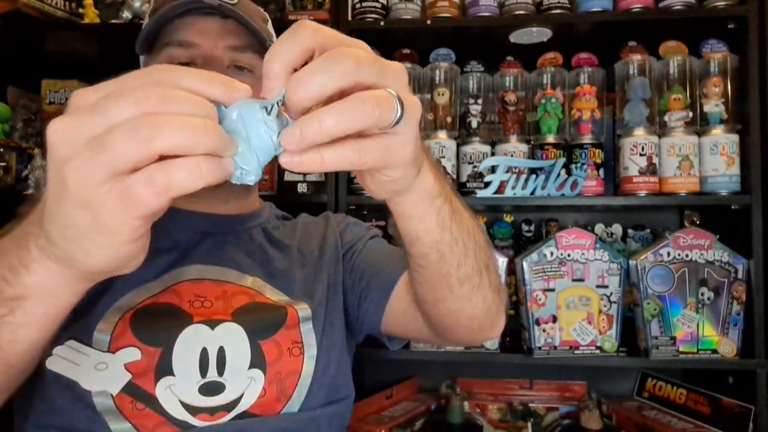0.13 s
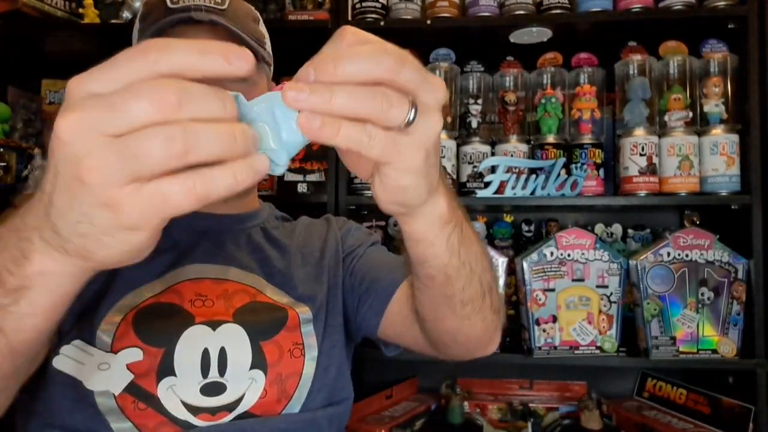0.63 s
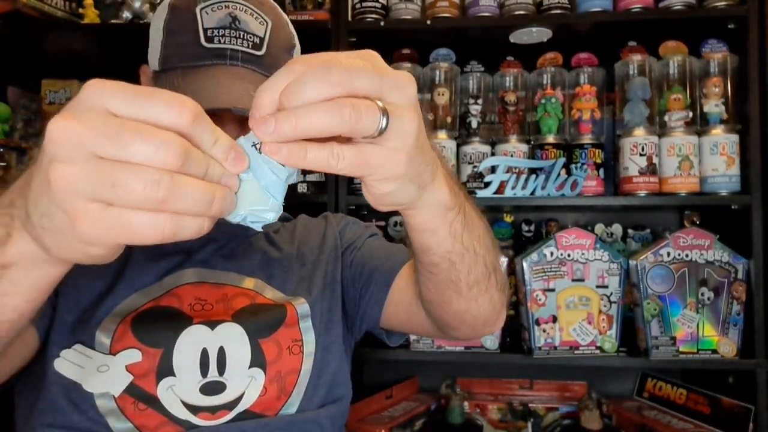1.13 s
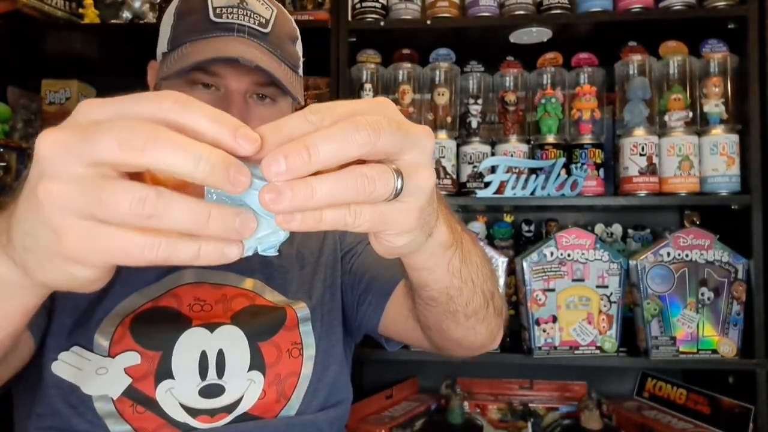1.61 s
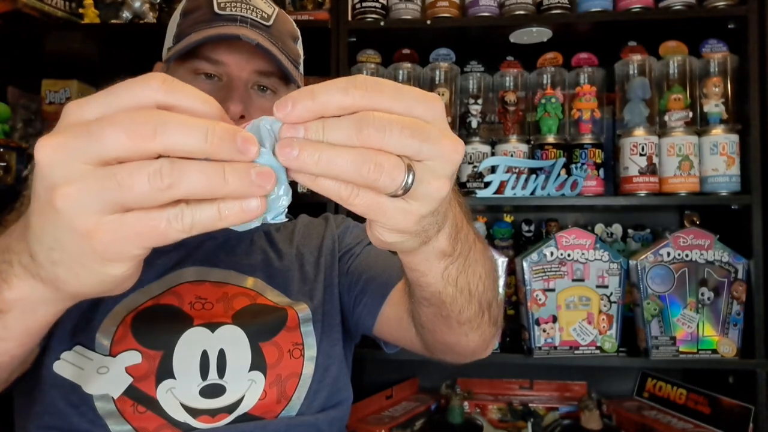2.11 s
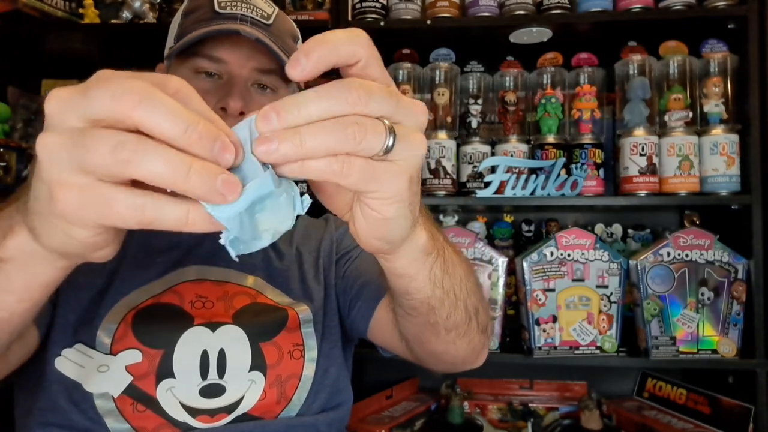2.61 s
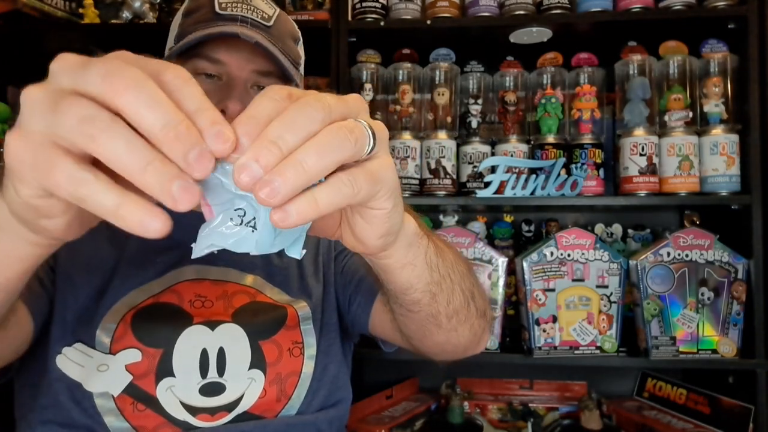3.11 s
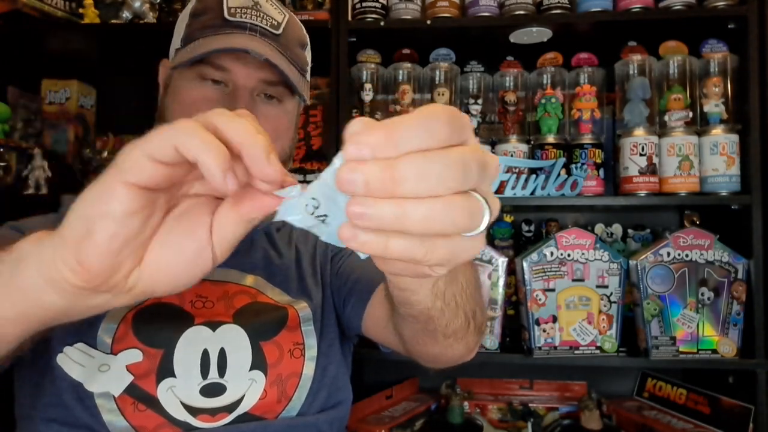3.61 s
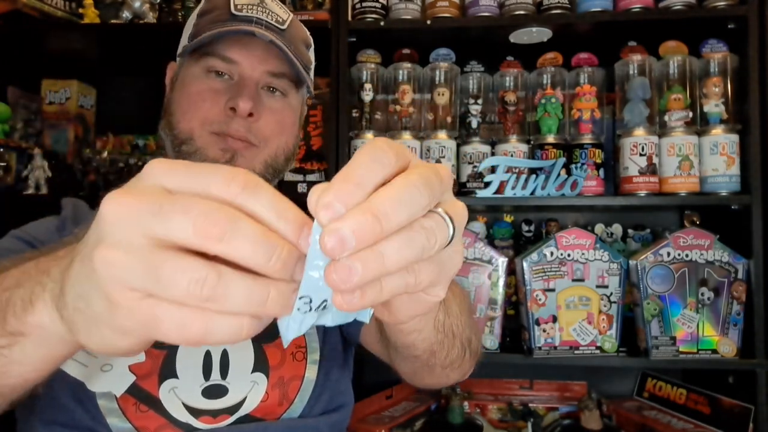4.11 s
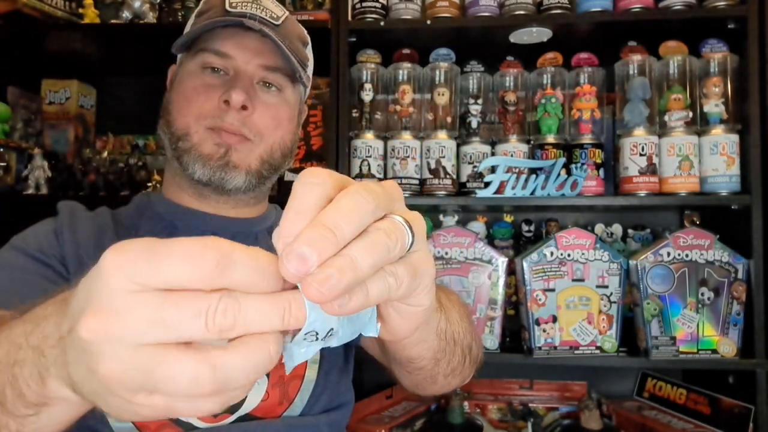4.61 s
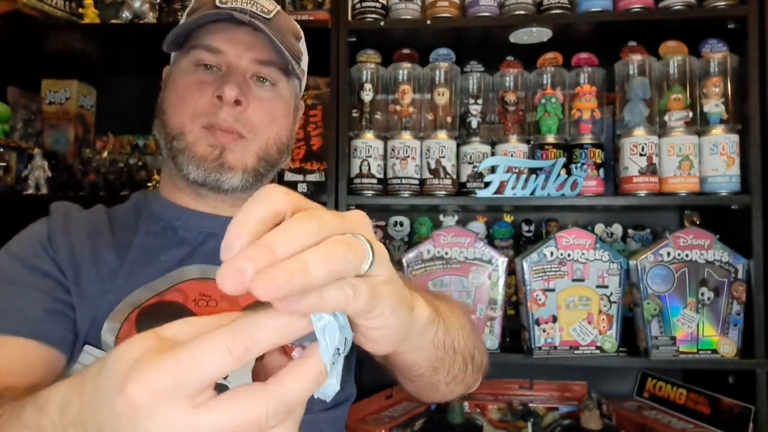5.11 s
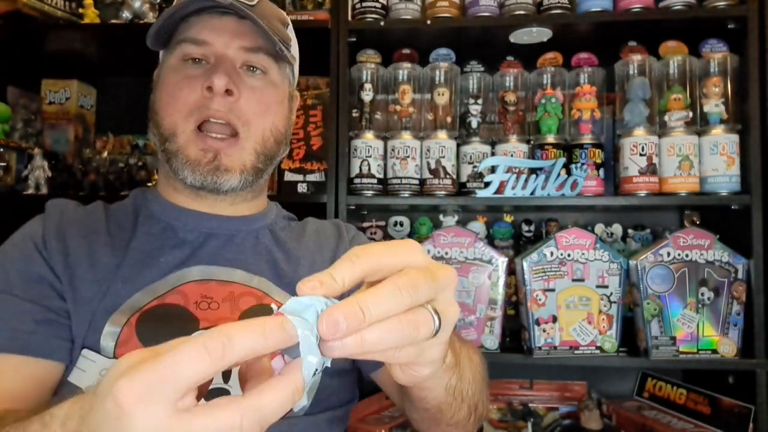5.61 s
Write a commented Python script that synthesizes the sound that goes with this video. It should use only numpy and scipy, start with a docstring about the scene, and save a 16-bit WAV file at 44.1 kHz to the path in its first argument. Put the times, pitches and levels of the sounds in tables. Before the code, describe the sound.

A small, thin plastic wrapper is worked and pulled open by two hands, close to a stereo pair of microphones in a furnished room. From 0 to 0.4 s, a dense burst of bright, dry snaps and fine crackle. It thins to scattered crinkles until about 1.1 s, then gets busy again to 2.8 s, with clumps of sharp ticks and papery rustle and a few soft low puffs near 2.3 to 2.7 s. After a tiny lull, crinkling resumes around 3 s; strong squeezes at 3.5 to 3.75 s add fuller snaps and a dull thump. From 3.8 to 4.7 s only separate light ticks and short crackles. From 4.8 to 5.7 s a dense finish, with more body and soft thumps near 5.0 and 5.45 s. Short diffuse room reflections follow each snap. A very faint low hum swells and sinks beneath, with slight hiss.

```python
"""Two hands crumple and pull open a small thin plastic wrapper close to two microphones in a furnished room.
A dense burst of snaps and crackle opens the scene and thins out after 0.4 s; from 1.1 s to 2.8 s it is busy again.
Strong squeezes and soft thumps follow near 3.5 s, then a sparser stretch, then a dense finish from 4.8 to 5.7 s.
Snaps and crackle are kicked ringing patches of film; thumps are short low swings. Throughout, a noise-and-tone
hum swells and sinks, and a tail of shaped noise answers the wrapper as the room."""
import sys
import numpy as np
from scipy import signal
from scipy.fft import rfft, irfft, next_fast_len
from scipy.io import wavfile

SR = 44100
rng = np.random.default_rng(int(sys.argv[2]) if len(sys.argv) > 2 else 0)


def ratio(d):
    """dB to gain"""
    e = np.asarray(d, float) / 20
    return 10 ** e


def dump(signal):
    """Clip the signal to [-1, 1] and save it as 16-bit WAV at the path in sys.argv[1]."""
    limited = np.clip(np.atleast_2d(signal).T, -1, 1)
    pcm = np.round(limited * 32767).astype(np.int16)
    wavfile.write(sys.argv[1], SR, pcm)


N = 252773   # length in samples


def at_hz(points, hz):
    """Reads a spectrum on a log-frequency axis."""
    point_hz, point_db = np.transpose(points)
    return np.interp(np.log(hz), np.log(point_hz), point_db)


def drift(rate_hz):
    """Slow chance with spread 1: white noise smoothed by two equal low-pass steps."""
    r = np.exp(-2 * np.pi * rate_hz / SR)
    slow = signal.lfilter([1], [1, -2 * r, r * r], rng.standard_normal(N + SR))[SR:]   # skip the start-up
    return slow / slow.std()


# colour of the low house noise; only its shape counts: pitch_hz [Hz], level_db [dB]
HUM_COLOUR = [(18, -40), (30, -20), (64, -10), (97, -1), (188, 9), (209, 10), (241, -12), (281, -6),
              (500, -53), (650, -41), (1100, -120)]
# the hum swells and sinks: time_s [s], level_db [dB]
HUM_LEVEL = [(0.0, -76), (1.98, -74.5), (2.22, -69.5), (2.94, -74.5), (3.56, -71), (3.94, -77),
             (5.15, -68.5), (5.73, -71)]


def hum(side_db, waver_db):
    """Low house noise, a little different in each ear, with a wavering mains tone."""
    mains_hz, mains_db = 58.3, -5   # level is against the noise
    t = np.arange(N) / SR
    freqs = np.fft.rfftfreq(N, 1 / SR) + 1   # 1 Hz up, to avoid log of zero
    coloured = rfft(rng.standard_normal((2, N))) * ratio(at_hz(HUM_COLOUR, freqs))
    mid, side = irfft(coloured, N)
    stereo = (mid + ratio(side_db) * side * [[1], [-1]]) / mid.std()
    noise = ratio(waver_db * drift(3.2)) * stereo
    mains_level = ratio(mains_db + 2.0 * drift(3.2)) * np.sqrt(2)
    wander = 0.85 * drift(7.6) + 0.29 * drift(4.9) * [[1], [-1]]   # radians; the second part parts the ears
    mains = mains_level * np.sin(2 * np.pi * mains_hz * t + wander)
    return ratio(np.interp(t, *np.transpose(HUM_LEVEL))) * (noise + mains)


# echo by pitch region: pitch_hz [Hz], main_t60_s [s to fall 60 dB], relative_tail_db [dB]
ROOM_BANDS = [(930, 0.081, -13.5), (3240, 0.13, -5), (6800, 0.12, -6.5), (13800, 0.04, -1.5)]


def room(x):
    """A tail of dense reflections, dying faster in the top treble; its pattern changes as the hands move."""
    t = np.arange(SR // 3) / SR
    size = next_fast_len(N + len(t))
    centres = np.log(np.array(ROOM_BANDS)[:, 0])
    freqs = np.log(np.fft.rfftfreq(size, 1 / SR) + 1)
    first_walls = np.clip((t - .0015) / 0.00033, .1, 1)   # first walls answer late
    far_corners = ratio(-22.5 - 60 * t / 0.2)   # far corners linger
    places = np.linspace(0, N, num=11)   # the echo pattern crossfades from each place to the next
    out = 0
    for place in range(len(places)):
        white = rng.standard_normal((2, len(t)))
        white = white + .5 * white[::-1]   # the two ears share part of the echo
        tail = 0
        for k, (hz, t60, tail_db) in enumerate(ROOM_BANDS):
            decay = (ratio(-60 * t / t60) + far_corners) * first_walls
            share = np.interp(freqs, centres, np.arange(len(ROOM_BANDS)) == k)
            reflections = rfft(white * decay, size) / np.sqrt(np.sum(decay ** 2))
            tail = tail + ratio(tail_db) * share * reflections
        fade = np.interp(np.arange(N), places, np.arange(len(places)) == place)
        out = out + tail * rfft(x * fade, size)
    return irfft(out, size)[:, :N]


# the whole pouch flexing: start_s [s], swell_peak_db [dB], pitch_hz [Hz]
THUMPS_PLAYED = [(0.127, -61, 285), (0.168, -53, 380), (0.284, -72, 363), (1.188, -62, 267),
                 (1.3, -52, 221), (1.33, -58, 199), (1.94, -66, 450), (2.267, -46.5, 462),
                 (2.554, -44, 440), (2.721, -46, 425), (3.213, -56, 407), (3.469, -55, 360),
                 (3.499, -65, 447), (3.618, -40, 383), (4.854, -42, 362), (4.912, -48, 395),
                 (4.963, -46, 430), (4.994, -39.5, 400), (5.364, -46.5, 378), (5.445, -38, 423)]


def thumps(cycles):
    """A soft push sets the air-filled pouch swinging; the swing peaks after this many cycles, then dies."""
    out = np.zeros(N + SR)
    t = np.arange(SR // 20) / SR
    for s, peak_db, hz in THUMPS_PLAYED:
        swing = t * hz / cycles
        swell = np.e * swing * np.exp(-swing)   # peaks at 1
        out[round(s * SR):][:len(t)] += ratio(peak_db) * swell * np.sin(2 * np.pi * hz * t)
    return out[:N]


# where thud, knock, middle and tick sit: pitch_hz [Hz]
COLOUR_PITCHES = (850, 2100, 5000, 11500)
# favoured pitches of film and microphones: pitch_hz [Hz], boost_db [dB]
FAVOURED_PITCHES = [(300, -35), (420, -32.5), (600, -18.5), (860, 0), (1300, -2), (2150, 2), (2900, -1.5),
                    (4060, -0.5), (6200, -0.5), (7290, 6), (9000, 1.5), (12600, 10), (15500, 3.5)]


def film(seconds, level_db, colour_db, ring_hz, ring_db, pan_db, cycles, scatter_db,
         lag_s, lag_spread_s, turn, scramble, reach_s):
    """Each buckling crease kicks all patches of the film, every patch with its own strength and phase."""
    pitches = np.geomspace(1500, 16700, num=48) - 1200   # 300 to 15500 Hz, close enough to overlap
    luck = rng.standard_normal((len(seconds), 5, len(pitches)))
    colour = np.array([np.interp(np.log(pitches), np.log(COLOUR_PITCHES), c) for c in colour_db])
    # the patch beside the crease rings loudest
    ring = ring_db * np.exp(-(np.log(pitches / ring_hz[:, None]) / 0.12) ** 2)
    balance_db = 10 * np.log10(.45 + 540 / pitches) + at_hz(FAVOURED_PITCHES, pitches)
    strength = ratio(level_db[:, None] + colour + ring + balance_db + scatter_db * luck[:, 0])
    # a small scramble moves the patches nearly in step, as in a clean jump
    phase = 2 * np.pi * (luck[:, 2, 1:2] + scramble * luck[:, 1])
    # the crease is nearer one microphone: a lag per kick, and scatter that grows with pitch
    lag = lag_s + lag_spread_s * luck[:, 2, :1]
    between = 2 * np.pi * pitches * lag + turn * np.sqrt(pitches / 1e4) * luck[:, 3]
    # the buckle takes a moment to reach each patch
    reached = seconds[:, None] + reach_s * np.abs(luck[:, 4])
    at = np.clip(np.round(reached * SR).astype(int), 0, N - 1)
    out = np.zeros((2, N))
    for k, hz in enumerate(pitches):
        r = ratio(-60 * hz / ((cycles + hz * 0.0026) * SR))   # high patches ring more cycles
        pole = r * np.exp(2j * np.pi * hz / SR)
        kicks = np.full((2, N), 1e-18 + 0j)
        for side, sign in enumerate((.5, -.5)):
            push = strength[:, k] * ratio(sign * pan_db)
            np.add.at(kicks[side], at[:, k], push * np.exp(1j * (phase[:, k] + sign * between[:, k])))
        ringing = signal.lfilter([1], [1, -2 * pole, pole ** 2], kicks).real   # swells briefly, then dies
        out += np.e * (1 - r) * ringing
    return out


# fingers squeezing the film: start_s [s], length_s [s], relative_crackle_db [dB],
# low_colour_db [dB, thud region against the middle]
SQUEEZES_PLAYED = [(0.045, 0.36, -29.5, -25), (0.606, 0.15, -36.5, -17), (0.834, 0.015, -34, -23),
                   (1.117, 0.25, -32.5, -16), (1.413, 0.16, -31, -21), (1.75, 0.043, -54, -22),
                   (1.798, 0.035, -37, -13), (1.858, 0.035, -47, -18), (1.94, 0.039, -33, -10.5),
                   (2.032, 0.11, -28, -23), (2.181, 0.061, -34.5, -20), (2.314, 0.13, -33.5, -14.5),
                   (2.494, 0.15, -27.5, -20), (2.671, 0.13, -33, -6), (2.944, 0.067, -37.5, -20),
                   (3.054, 0.024, -36, -12), (3.107, 0.14, -36.5, -7), (3.194, 0.042, -56, -14),
                   (3.467, 0.27, -25.5, -10), (3.85, 0.028, -39, -21), (3.994, 0.047, -46, -12),
                   (4.084, 0.056, -40, -17.5), (4.168, 0.073, -36, -17), (4.695, 0.079, -37.5, -9.5),
                   (4.82, 0.28, -29.5, -15), (4.952, 0.1, -30, -10.5), (5.06, 0.12, -37, -10.5),
                   (5.184, 0.1, -26.5, -16.5), (5.354, 0.071, -35.5, -6.5), (5.436, 0.18, -30, -11),
                   (5.69, 0.054, -43.5, -14)]


def unrest(s):
    """Relative level in dB of the crackle at times s: squeezing, settling after snaps, and rest, added up."""
    grip_db_per_s, let_go_db_per_s = 2500, 335   # the crackle swells and fades at these speeds
    settle_db, settle_db_per_s = -12.5, 256   # after a snap: start against the snap's table level, then fall
    rest_db = -53   # idle film
    start, length, grip_db, _ = np.transpose(SQUEEZES_PLAYED)[:, :, None]
    before, after = np.maximum(start - s, 0), np.maximum(s - start - length, 0)
    gripped = grip_db - grip_db_per_s * before - let_go_db_per_s * after
    snapped, snap_db = np.transpose(SNAPS_PLAYED)[:2, :, None]
    settling_db = snap_db + settle_db - settle_db_per_s * np.abs(s - snapped)
    settling = np.where(s > snapped, ratio(2 * settling_db), 0)
    return 10 * np.log10(ratio(2 * gripped).sum(axis=0) + settling.sum(axis=0) + ratio(2 * rest_db))


def crackle():
    """Small creases buckle at chance times, in clumps, a few much stronger than the rest."""
    sheen_db = -8.5   # treble against the middle
    per_second = 900 * ratio(5 * drift(30))
    born = rng.random(N) < per_second / SR
    s = np.flatnonzero(born) / SR
    start, length, _, depth_db = np.transpose(SQUEEZES_PLAYED)
    low = np.interp(s, start + .5 * length, depth_db)
    sizes_db = 3.376 * np.minimum(rng.exponential(1, N), 4)[born]
    colour = np.transpose([low, 0.22 * low - 1.5, 0 * s, sheen_db + 0 * s])
    ring_hz = 700 * 21 ** rng.random(N)[born]   # 700 to 14700 Hz
    return film(s, unrest(s) + sizes_db - 27.5, colour, ring_hz, 13.5, -0.64,
                cycles=4.85, scatter_db=3.0, lag_s=3e-5, lag_spread_s=4e-5, turn=3.2,
                scramble=1, reach_s=.0004)


# creases buckling: time_s [s], relative_level_db [dB], then colour before a fixed trim, against the middle:
# thud_db [dB], knock_db [dB], tick_db [dB]
SNAPS_PLAYED = [(0.0087, -40.5, -22, -0.5, -10), (0.027, -37.5, -11, 8, 2), (0.045, -39, -1, 8.5, -16),
                (0.0625, -19.5, -25, -18, -1.5), (0.0727, -31.5, -16, 2, -2), (0.0867, -25, -29, -21, -7),
                (0.0957, -23, -33, -18, -8), (0.1056, -29, -30, -10, -10), (0.1154, -21.5, -31, -9, -8),
                (0.1318, -14.5, -28, -27, -10), (0.1423, -24, -31, -13, -7), (0.1507, -22, -11, -19, -1),
                (0.1792, -19, -28, -4, -0.5), (0.1926, -38, -29.5, -12, 9), (0.2036, -26.5, -11, -1, -5),
                (0.21, -23, -20, -7, -14), (0.2195, -31, -15, 1, -8), (0.231, -19.5, -18, -5, -11),
                (0.2468, -16, -14, -2, -9), (0.2574, -21, -30, -19, -12), (0.2877, -14.5, -22, -6.5, -23),
                (0.3035, -25, -12, -10, -17), (0.3232, -26, -27, -24, -4), (0.3348, -18.5, -35, -17, -13),
                (0.3654, -27, -23, -4, -6), (0.3838, -27.5, -26, -13, -9), (0.3976, -31, -34, -15, -6),
                (0.41, -24.5, -33, -31, -9), (0.4743, -46, -10, 1, -11), (0.4864, -30.5, -44, -32, -13.5),
                (0.5334, -49.5, -36, -10, -9), (0.5815, -52, -54, -19, -4), (0.5942, -33.5, -39, -19, -9),
                (0.6175, -25, -35, -27, -10), (0.624, -23, -32, -4, -3.5), (0.6584, -32, -13, 4.5, -2),
                (0.705, -32.5, -21, -1, -16), (0.7262, -33, -13, 0, -0.5), (0.7743, -37.5, -15, -6, -16),
                (0.8368, -39.5, -13, 6.5, -23), (0.8513, -29, -16, -6.5, -9), (0.8604, -34, -12, -4, -7),
                (0.9746, -28.5, -56, -8.5, -18), (1.024, -43, -17, 1.5, -9), (1.0435, -32.5, -24, -0.5, -6),
                (1.092, -33, -30, -5, -12), (1.1142, -41, -27, -1, 6), (1.1259, -36, -25, 2, -12),
                (1.147, -25.5, -15, 5, -21), (1.1609, -26, -14, -10, -4), (1.1697, -26.5, -23, -2, -3),
                (1.1856, -21.5, -18, 1, -17), (1.206, -28, -20, 1, -1), (1.2242, -17.5, -24, -10, -4.5),
                (1.235, -39, -27, -9, -4), (1.2525, -23.5, -28, 1, -12), (1.2669, -23, -13, -5, -25),
                (1.2739, -19.5, -18, 9.5, -8), (1.287, -36, -2, -2, -18), (1.3059, -13.5, -15, -7, -12.5),
                (1.3378, -14, -30, -14, -9.5), (1.3686, -23.5, -34, -18, -8),
                (1.4253, -31, -18.5, -0.5, -16), (1.4337, -35, -12, 11.5, -21), (1.4508, -19.5, -27, 0, -6),
                (1.4625, -24.5, -27, -7, -1), (1.4698, -25.5, -19, -2, -12), (1.492, -35, -26, -6, 6),
                (1.5104, -45, -28, -7, -17), (1.526, -20.5, -46, -0.5, -12), (1.5452, -36, -30, -15, -8),
                (1.5665, -33, -5.5, 9.5, -5), (1.5796, -19.5, -32.5, -1.5, -4),
                (1.6597, -28, -48, -0.5, -7), (1.7289, -33, -39, -8, -13), (1.753, -29, -32, -8, -13),
                (1.7607, -24, -49, -12, -1.5), (1.7942, -31, -28, 2.5, -1), (1.8677, -28.5, -30, -1, -25),
                (1.886, -22.5, -38, 4.5, -9.5), (1.9437, -25, -17, -7, -6), (1.9515, -19.5, -21, -2, -8.5),
                (1.958, -19.5, -22, -4.5, -12), (1.9755, -31, -14, -6, 0), (2.023, -25.5, -10.5, -1, -6),
                (2.0453, -24, -29, -8, -4), (2.066, -23.5, -22, -6, -10), (2.0757, -22, -20, -5, -3),
                (2.1043, -26.5, -14, -0.5, -4), (2.1229, -26.5, -21, -7, 3), (2.1512, -32, -28, 0, -8),
                (2.1909, -14, -48, -16, -12.5), (2.228, -31, -15, 9.5, 2), (2.2372, -22, -28, -5, -6),
                (2.2675, -36, 5, -3, -18), (2.3148, -34.5, -16, -1, -11), (2.3235, -26, -13, -6, -7),
                (2.3346, -32.5, -7, 5.5, -7), (2.3496, -34, -21, -13, 0), (2.3667, -28, -25, -3, 8),
                (2.3968, -30, -17, -1, -2), (2.4096, -29.5, -10, -0.5, -12),
                (2.4194, -17.5, -11, -2.5, -10.5), (2.4478, -25, -8.5, -10, -9),
                (2.5022, -19.5, -36, 0.5, -10), (2.521, -20.5, -27, 2.5, -15), (2.537, -24.5, -17, -3, 1),
                (2.5454, -23.5, -8, -2, -3), (2.5588, -20.5, -6, -0.5, -2), (2.572, -27.5, -10, 1.5, 8.5),
                (2.5792, -29.5, 6.5, 5, -1), (2.596, -34, 6, 1, -9), (2.6166, -33, -16, -9, 5),
                (2.6369, -23.5, -8, 0.5, -2), (2.6458, -32.5, -1, 5, -7), (2.6958, -24, -36, -9, -5),
                (2.7038, -31, -29, -3.5, 0), (2.7253, -17.5, -9.5, 0, -13), (2.739, -28, -6, -4, 1),
                (2.7587, -26, -7, -5, -3), (2.768, -19, -31, -13, -8), (2.7961, -23, -9, -9, -5),
                (2.8056, -28.5, -20, -3, -10), (2.9434, -34.5, -27, 0, -6), (2.9623, -24, -42, -8, -27),
                (2.9691, -40, -27, -18, 12), (2.9971, -21.5, -23, -4, -9.5),
                (3.0143, -25, -12.5, -10.5, -8), (3.0686, -24, -11, -3.5, -4),
                (3.1036, -18.5, -18, -9.5, -12), (3.1244, -28, -21, -4, -11), (3.1466, -34, -17, 5, -18),
                (3.1573, -21.5, -16, -1.5, -2), (3.1723, -33.5, 4.5, -1.5, -3), (3.214, -30, -6, 4, -11),
                (3.225, -22.5, -12, -3, -5), (3.2311, -21, -13, 3, 2), (3.261, -36, 2.5, -19, -4),
                (3.3375, -49, -27, 0.5, -8), (3.3867, -51, -5, 7, -13), (3.4011, -27.5, -16, 2.5, -6.5),
                (3.4442, -52, 6, 7, -6), (3.4845, -25, -16, -13, -1), (3.491, -27.5, -26, -24, 0.5),
                (3.5024, -19.5, -1.5, 0, -9), (3.5085, -39, 1, 8, -13), (3.514, -30.5, 11.5, 4, -19),
                (3.5437, -26.5, -8, -4, -1), (3.556, -39, -7, 15, -1), (3.5637, -29, -14, 10.5, 6.5),
                (3.5753, -13.5, -8, -12, -11), (3.586, -36, -4, 16.5, -2), (3.608, -29.5, -13, 3, 8),
                (3.634, -21, -12, -6, -9), (3.6543, -14, -17, -10, -19), (3.665, -17.5, -18, -17, -6.5),
                (3.669, -26, 6, 5, 6), (3.6825, -28.5, 4, -17, -12), (3.6979, -21, -3.5, -0.5, -3),
                (3.7101, -40, -3, 7, -10), (3.7183, -26, 1.5, -0.5, -1), (3.7333, -39.5, 12, 3, -19),
                (3.7548, -31.5, -28, 0, 13), (3.7984, -31.5, -43, -9, -7), (3.8368, -35, -43, -11, -7),
                (3.8521, -45, -6, 6, -10), (3.8651, -20, -20, -8, -7), (3.913, -39, -18, -7, 0),
                (3.931, -33, -24, -9, -32), (3.9871, -31, -35, -15, -11.5), (3.9922, -27, -20, -4, -5),
                (4.0003, -32, -13, -4, -9), (4.0583, -38, -8, -1, 5.5), (4.1002, -27, -27, -10, -24),
                (4.113, -42, -8.5, -5, -16), (4.1353, -47.5, 23.5, -1, -10), (4.1566, -32.5, 7, 11, 2.5),
                (4.1801, -30, -2, 7, -3), (4.1898, -31.5, -20, -13, -3), (4.2182, -26, -11, -18, -5),
                (4.3054, -34.5, -31, -7, -11), (4.3292, -31, -29, -11, -22), (4.3545, -38, -19, -0.5, -8),
                (4.395, -44, -52, -12, -2), (4.4141, -25.5, -46, -9, -7), (4.5314, -40, -41, -1, -8),
                (4.547, -33.5, -34, -4, -2.5), (4.5791, -36.5, -16, 5.5, -7), (4.6075, -37.5, -20, 0, -17),
                (4.65, -26, -9, -26.5, -9), (4.6761, -41, -9, 1, 1), (4.711, -19, -20, -10.5, -15.5),
                (4.811, -35.5, -16, -0.5, -18), (4.836, -30.5, 3.5, 8.5, 2.5),
                (4.8666, -17.5, -20, -0.5, -7.5), (4.8768, -32.5, 4, 4, 1), (4.9162, -22.5, 0, -1, 0),
                (4.958, -24.5, -18, -5, -6), (4.9659, -27, 1, -5, -6), (4.9751, -22, -6, -1, -5),
                (5.009, -20.5, -15, -2, -6.5), (5.0231, -26.5, -8, -11, -4), (5.058, -31, -20, 0, -15),
                (5.0764, -29, -13, 0, -9), (5.0866, -28.5, -20, -3, -4), (5.1061, -26.5, -4, -6, -3),
                (5.1211, -18, -13, -10, -9), (5.152, -27, -22, -3, -2), (5.1885, -18.5, -27, -1, -2),
                (5.207, -26, -17, 4.5, -4), (5.2706, -21, -25, -14, -7), (5.2846, -26, -8, -1.5, -10),
                (5.298, -35, 0, 1, -14), (5.3116, -45, 14, 11, -12), (5.347, -37, -14, 4, -4),
                (5.3656, -17.5, -18, -10, -27), (5.406, -32, -20, -20, 2), (5.436, -26.5, -13, -4, -13),
                (5.456, -26.5, 1, 2.5, -4), (5.4732, -19.5, -3, -11, -14), (5.4927, -29.5, -15, 1, -2),
                (5.522, -30, -16, -8, 1), (5.5327, -18, -37, -10.5, -18), (5.5442, -27, -14, -22, -10),
                (5.5628, -33.5, -15, 8.5, 5), (5.5855, -21, -6.5, -2, -3), (5.6437, -33, -17, -25, -5),
                (5.668, -40, -14, -18, 3.5), (5.6909, -23.5, -5.5, -2.5, -9),
                (5.7281, -31.5, -4, -1.5, 4.5)]


def snaps():
    """The single loud creases; each gives way in a main jump with weaker slips just before or after."""
    broad_ring_hz = 1980   # creases that knock ring low
    low_hz, high_hz = 3100, 7570   # the others ring anywhere in this range
    s, level_db, thud, knock, tick = np.transpose(SNAPS_PLAYED)
    slips = rng.random((len(s), 3, 3))
    pan_db = -2.2 + 5.7 * (slips[:, 2, 0] - .5)
    # of the three movements the first is the main jump, neither shifted nor weakened
    late_s = (slips[:, 0] - .3) * 0.0056 * [0, 1, 1]
    weaker_db = (6 + 11 * slips[:, 1]) * [0, 1, 1]
    any_ring_hz = low_hz * (high_hz / low_hz) ** slips[:, 2, 1]
    ring_hz = np.where(knock > 0, broad_ring_hz, any_ring_hz)
    colour = np.transpose([thud - 3, knock - 2.5, 0 * s, tick - 2.5])
    seconds = (s[:, None] - .0008 + late_s).ravel()
    slip_db = (level_db[:, None] - 8.5 - weaker_db).ravel()
    return film(seconds, slip_db, np.repeat(colour, 3, axis=0), np.repeat(ring_hz, 3, axis=0), 5.4,
                np.repeat(pan_db, 3, axis=0), cycles=7.17, scatter_db=2.5, lag_s=3e-5,
                lag_spread_s=3e-5, turn=1.0, scramble=.2, reach_s=.00015)


def scene():
    """The wrapper, its echo in the room, and the hum."""
    no_bass = signal.butter(3, 260, "high", fs=SR, output="sos")   # creases are too small to radiate bass
    creases = signal.sosfilt(no_bass, snaps() + crackle())
    wrapper = creases + thumps(cycles=0.61)
    return wrapper + room(wrapper) + hum(side_db=-11, waver_db=1.0)


def band_limit(x):
    """A steep low-pass at the top of the band."""
    return signal.sosfilt(signal.butter(12, 16800, fs=SR, output="sos"), x)


def record(dry):
    """The microphones add a faint hiss, and their top is rolled off."""
    heard = dry + ratio(-70) * rng.standard_normal(dry.shape)
    roll_off = signal.cheby2(10, 13, 15800, fs=SR, output="sos")
    heard = signal.sosfilt(roll_off, heard)
    return band_limit(heard)


dry = scene()
out = record(dry)
dump(out)
```